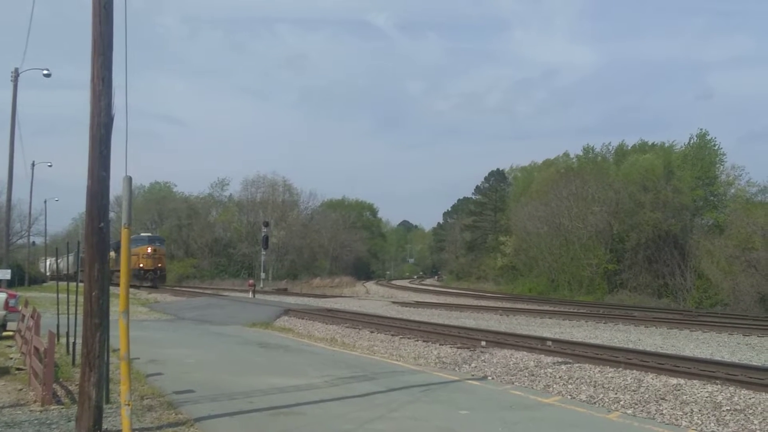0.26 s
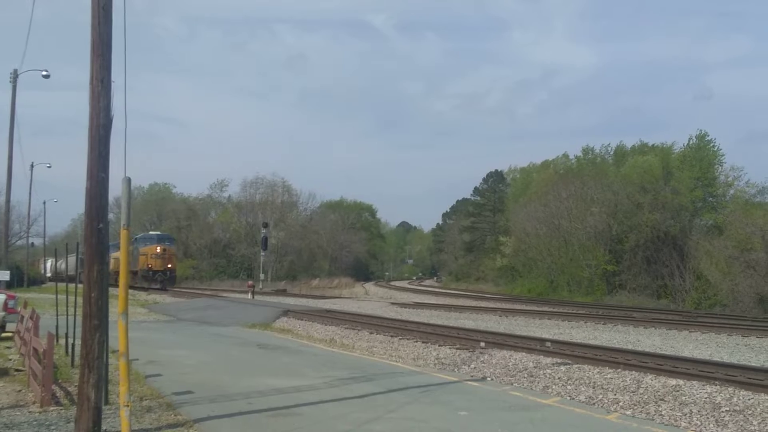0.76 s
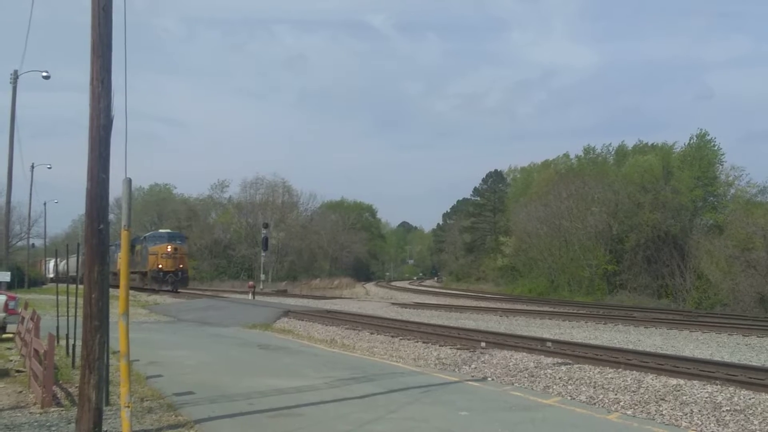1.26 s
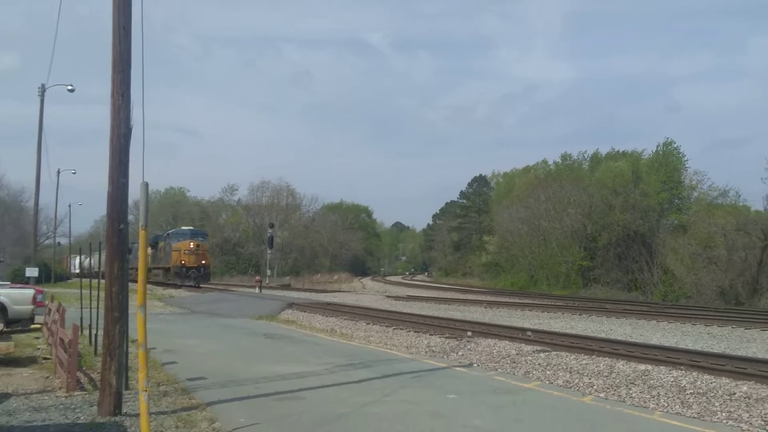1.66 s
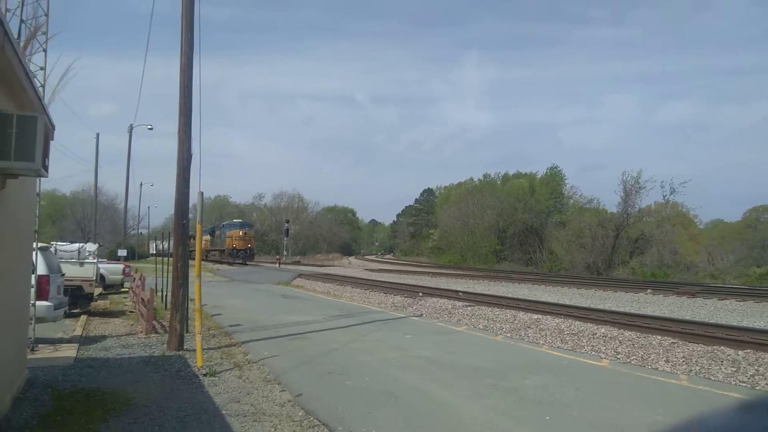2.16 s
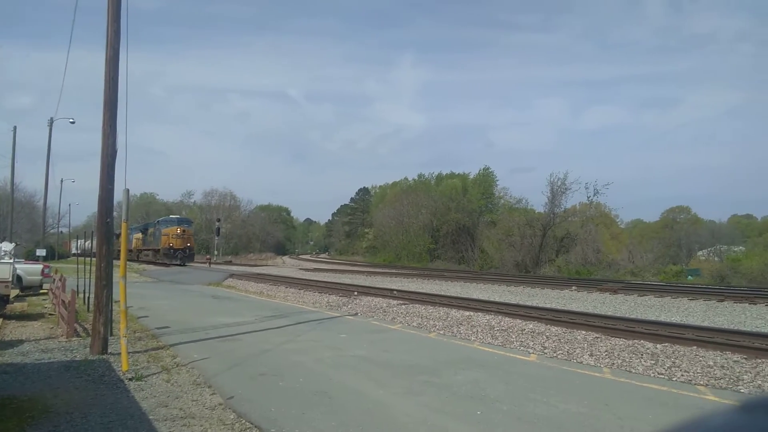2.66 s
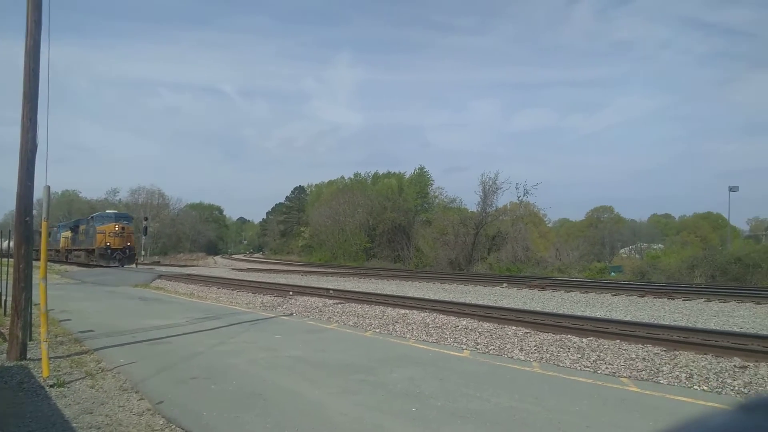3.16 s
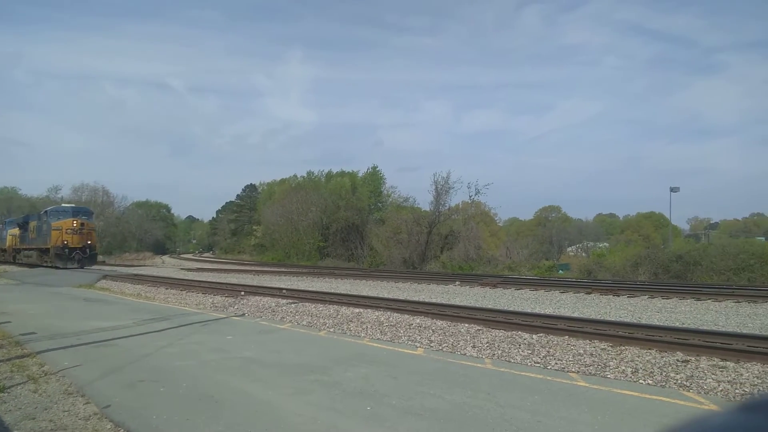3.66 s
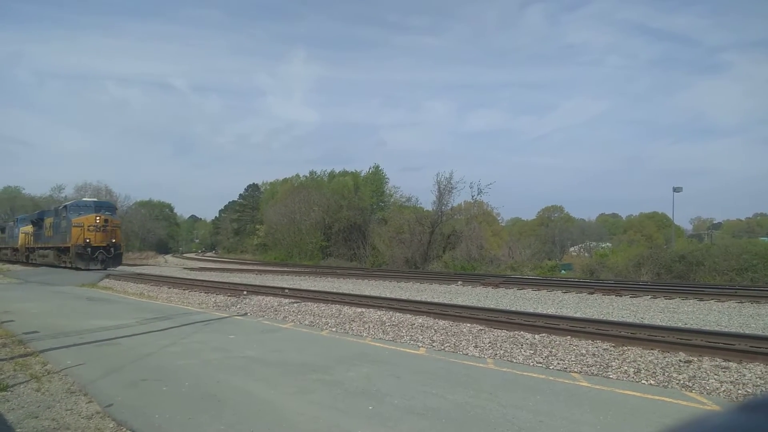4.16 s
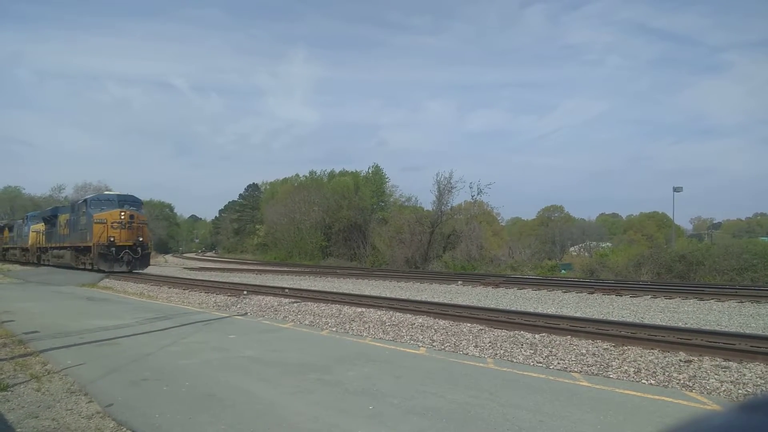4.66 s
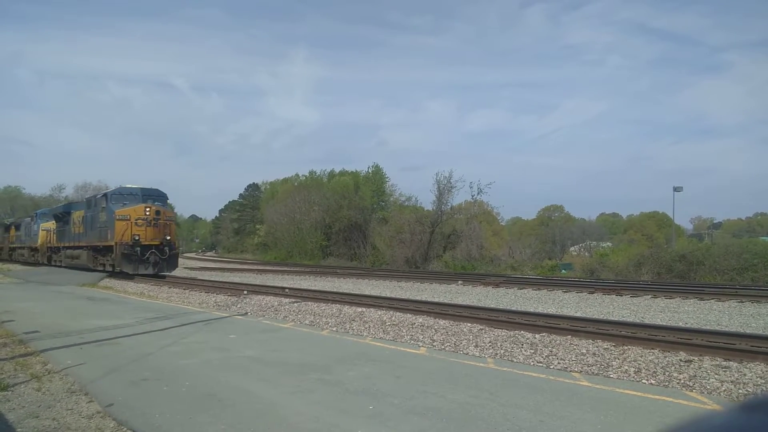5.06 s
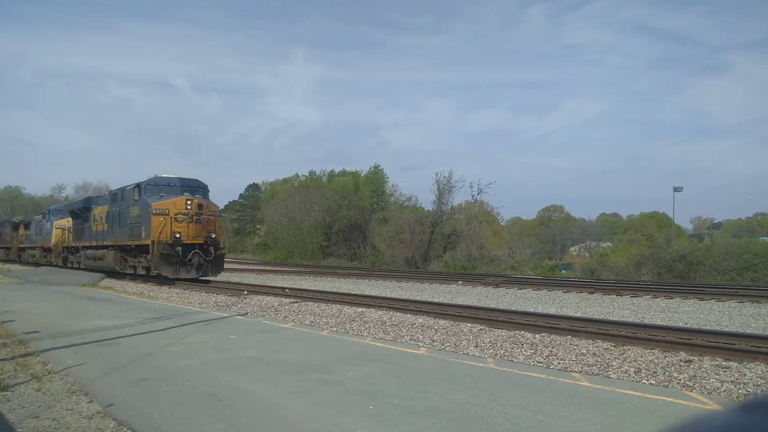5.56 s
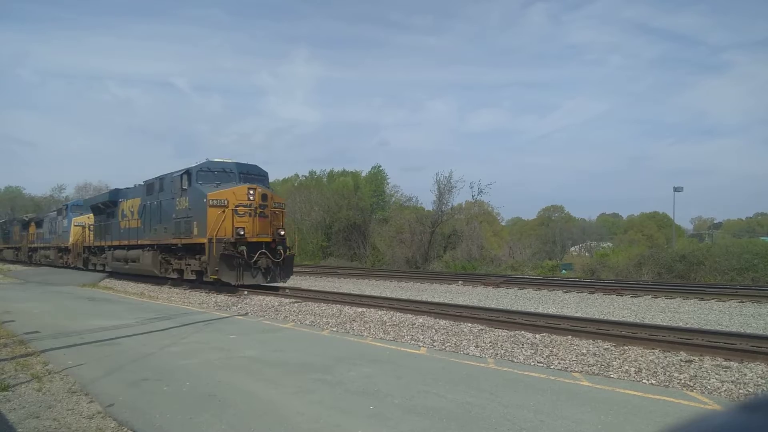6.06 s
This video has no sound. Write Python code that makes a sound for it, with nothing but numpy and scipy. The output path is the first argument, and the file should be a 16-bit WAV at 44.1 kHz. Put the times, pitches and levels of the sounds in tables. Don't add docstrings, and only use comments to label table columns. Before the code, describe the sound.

A handheld phone in open air catches an approaching freight train: rough engine rumble, a beating low drone and grainy rolling noise, gradually fuller and closer. Faint birds chirp at the start, small air ticks follow, and wind gusts boom on the left, briefly dulling the level. Metallic rail ringing and gear whine emerge, then air hisses and a loud dissonant horn chord bursts in and is cut off.

```python
import sys
import numpy as np
from scipy import signal
from scipy.fft import rfft, irfft
from scipy.io import wavfile
from scipy.ndimage import uniform_filter1d, map_coordinates

SR = 44100
rng = np.random.default_rng(int(sys.argv[2]) if len(sys.argv) > 2 else 0)


def store_pcm(level_fs):
    pcm = np.round(np.clip(level_fs, -1, 1) * 32767).astype(np.int16)
    wavfile.write(sys.argv[1], SR, np.atleast_2d(pcm).T)


def elevation(decibels):
    levels = np.asarray(decibels, float)
    return 10 ** (levels / 20)


N = 278712
T = np.arange(N) / SR


def curve(table):
    s, *columns = np.transpose(table)
    return [np.interp(T, s, c) for c in columns]


def unit(x):
    return x / np.sqrt(np.mean(x ** 2))


def walk(rate):
    k = int(SR / rate)
    held = np.repeat(rng.standard_normal(N // k + 1), k)
    return unit(uniform_filter1d(uniform_filter1d(held, k), k)[:N])


def bump(s, width):
    return np.exp(-((T - s) / width) ** 2)


def swell(s, lasts):
    return np.sin(np.pi * np.clip((T - s) / lasts, 0, 1))


def coloured(shape, flicker_db, rate, count=4):
    log_hz = np.log(np.fft.rfftfreq(N, 1 / SR) + 1)
    at, db = np.log(np.array(shape)[:, 0]), np.array(shape)[:, 1]
    spectrum = rfft(rng.standard_normal(N)) * elevation(np.interp(log_hz, at, db, -120, -120))
    centres = np.linspace(at[0], at[-1], count)
    total = np.zeros(N)
    for share in np.eye(count):
        band = irfft(spectrum * np.interp(log_hz, centres, share), N)
        total += band * elevation(flicker_db * walk(rate))
    return unit(total)


def tone(hz, blur=0.):
    cycles = np.cumsum(hz + 0 * T) / SR + rng.random()
    return np.sqrt(2) * np.sin(2 * np.pi * cycles + blur * walk(6))


def high_passed(x):
    return signal.sosfilt(signal.butter(1, 500, "highpass", fs=SR, output="sos"), x)


def aimed(x, lag_ms, pan_db):
    left = map_coordinates(x, [np.arange(N) - lag_ms * SR / 1000], order=3, mode="nearest")
    ports = np.array([left, x])
    return ports + (elevation(np.outer([.5, -.5], pan_db + 0 * T)) - 1) * high_passed(ports)


# f/Hz, level/dB per Hz
SELF_NOISE = [(7000, -18), (10000, -8), (14500, -3)]


def self_noise():
    return elevation(-89.5) * np.array([coloured(SELF_NOISE, flicker_db=1.5, rate=30, count=3) for _ in range(2)])


# t/s after its start, level/dB, from f/Hz, to f/Hz, length/s
BIRD_NOTES = [
    (0, -56, 2400, 2100, .055),
    (.055, -56, 2150, 2200, .05),
    (.14, -53.5, 2900, 3100, .06),
]
# t/s, level/dB
BIRD_CALLS = [
    (.015, 2.5),
    (.4, 2),
    (.765, -5),
]


def bird():
    trill_hz = 130 * walk(450)
    out = np.zeros(N)
    for s, call_db in BIRD_CALLS:
        for after, db, from_hz, to_hz, lasts in BIRD_NOTES:
            glide_hz = np.interp(T - s - after, [0, lasts], [from_hz, to_hz])
            level = elevation(call_db + db + 3 * walk(91.7))
            out += level * swell(s + after, lasts) * tone(glide_hz + trill_hz)
    return out


# f/Hz, level/dB per Hz
GUST_SPECTRUM = [(20, -22), (40, -3.5), (80, 15), (160, 5.5), (260, -17), (420, -13), (800, -49.5)]
# t/s, peak level/dB, half width/s
GUSTS = [(.3, -42, 0.045), (.5, -35, 0.16), (.7, -25, .05), (1.001, -44, 0.28), (1.4, -25, 0.11),
         (1.65, -27.5, 0.17), (2.0, -24.5, 0.14), (2.5, -38, 0.41), (3.0, -27, 0.065), (3.25, -32, 0.13),
         (3.63, -29, 0.26), (3.8, -32, 0.11), (4.0, -25.5, 0.048), (4.22, -39, 0.082), (4.47, -32.5, 0.1),
         (5.0, -35.5, 0.072), (5.201, -36, .06), (5.53, -36, 0.092), (5.7, -45, 0.063), (5.98, -47, 0.066)]
# t/s, peak level/dB, f/Hz, length/cycles
BUFFETS = [
    (1.677, -11, 190, 1.2),
    (1.8, -6, 220, 1.4),
    (2.087, -5, 200, .9),
    (2.316, -9, 160, 1.2),
]


def wind():
    breeze_db = -37.5
    strength = elevation(breeze_db) + sum(elevation(db) * bump(s, width) for s, db, width in GUSTS)
    ports = [elevation(db) * coloured(GUST_SPECTRUM, flicker_db=2.5, rate=45, count=3) for db in (.4, -1.2)]
    out = strength * np.array(ports)
    for s, db, hz, cycles in BUFFETS:
        out[0] += elevation(db) * bump(s, cycles / hz / 2) * np.cos(2 * np.pi * hz * (T - s))
    return out


# t/s, level/dB, low f/Hz, high f/Hz, length/s
PUFFS = [(0.488, -74, 7800, 8500, 0.082), (1.289, -59.5, 11440, 13460, 0.0061),
         (1.29, -64.5, 10900, 13800, 0.023), (1.32, -77, 10560, 13860, .04),
         (1.459, -59.5, 6450, 9570, .008), (1.453, -59.5, 3320, 6140, 0.01), (1.462, -68, 7000, 9200, .04),
         (3.158, -65, 2365, 5380, 0.065), (5.978, -47.5, 4090, 13800, 0.016),
         (6.009, -64.5, 4000, 10740, 0.072), (6.173, -50.5, 3280, 12100, 0.026),
         (6.176, -52.5, 5130, 10300, 0.13), (6.174, -69, 10430, 14030, 0.11), (6.18, -57, 2350, 4270, 0.24)]


def puffs():
    rise, hold, fade = 0.17, 0.68, 0.48
    out, spit = np.zeros((2, N)), elevation(1.4 * walk(200))
    for s, db, low_hz, high_hz, lasts in PUFFS:
        i = int(s * SR)
        t = T[:min(N - i, SR // 2)]
        band = signal.butter(4, [low_hz, high_hz], "bandpass", fs=SR, output="sos")
        slope = signal.butter(1, 1.5 * low_hz, fs=SR, output="sos")
        air = unit(signal.sosfilt(np.vstack([band, slope]), rng.standard_normal((3, SR // 2))))[:, :len(t)]
        shape = np.minimum(t / (rise * lasts), 1) * np.exp(-np.maximum(t / lasts - hold, 0) / fade)
        ports = (1.5 * air[0] + 3.46 * air[1:]) * [[1.3], [.8]]
        out[:, i:i + len(t)] += elevation(db) * shape * ports
    return out * spit


HORN_ON_S = 6.1
IN_STEP_S = 6.1205


def turns(hz):
    phase = 2 * np.pi * np.cumsum(hz) / SR
    return phase - phase[int(IN_STEP_S * SR)]


def bell(hz, db, pressure_db, partials):
    on = int(HORN_ON_S * SR)
    phase, pressure_db, t = turns(hz)[on:], pressure_db[on:], T[on:]
    bark_db = 7.5 * np.exp(-((t - HORN_ON_S) / 0.026) ** 2)
    slip_s = .035
    slip_rad = 2.2 * (1 - np.exp(-np.maximum(t - IN_STEP_S - slip_s / 4, 0) / slip_s))
    drift_rad = 2.5 * np.abs(t - IN_STEP_S)
    stack = 0
    for k, p_db in enumerate(partials):
        level_db = p_db + 0.3 * k * pressure_db
        if k < 6:
            level_db = level_db + min(k / 2, 1) * bark_db
        level_db = level_db + 2.2 * min(k / 3 + .2, 1) * walk(20)[on:]
        angle = (k + 1) * phase + drift_rad * walk(8)[on:] + slip_rad * rng.uniform(-1, 1)
        tremble = .15 * min(k / 4, 1) * walk(90)[on:]
        stack = stack + elevation(level_db) * np.cos(angle + tremble)
    return np.sqrt(2) * elevation(db) * np.pad(stack, (on, 0))


# delay/ms to left port, delay/ms to right port, level/dB
HORN_ECHOES = [
    (7.24, 6.1, -16.5),
    (22.73, 33, -22),
    (45.9, 5.9, -13),
]


def slaps(x):
    out = np.zeros((2, N))
    for *delays, db in HORN_ECHOES:
        out += elevation(db) * np.array([np.interp(T - ms / 1000, T, x) for ms in delays])
    return out


# t/s, level/dB re full
PRESSURE = [(6.1, -22), (6.107, -7.5), (6.128, -1.5), (6.15, -2.5), (6.19, 0), (6.24, 1), (6.275, -1),
            (6.32, -4)]
# f/Hz, sag/Hz per s
BELL_PITCH = [
    (273, 16),
    (338.3, 44),
    (409.5, 32),
]
# level/dB, dB per dB of pressure
BELLS = [
    (-26.5, 1.6),
    (-15, 1.0),
    (-20, 1.1),
]
# left port lag/ms, left minus right/dB
BELL_PORTS = [
    (0.19, -2.5),
    (0.044, -0.5),
    (0.1, 1.5),
]
LOW_PARTIALS = [-1, -19.5, -21, 0.5, -8, -38, -9, -30, -33, -24.5, -19, -23, -19.5, -31, -23, -25]
MID_PARTIALS = [-21.5, 2, -19.5, -30.5, -34, -49, -49, -48, -41, -52, -50.5]
TOP_PARTIALS = [-31, -8.5, -14, -13.5, -12.5, -18.5, -29.5, -41, -46]
# t/s, level/dB, f/Hz
OCTAVE = [(6.1, -23.5, 540), (6.115, -11.5, 553), (6.14, -21, 547), (6.17, -28, 554), (6.2, -37, 547.5),
          (6.225, -18.5, 544), (6.32, -22, 542)]
# f/Hz, level/dB per Hz
RASP = [(500, -22), (900, -1), (1500, -9), (2300, -14), (3600, -22), (5000, -23)]


def horn():
    pressure_db, since = curve(PRESSURE)[0], np.maximum(T - HORN_ON_S, 0)
    pitches = [hz - sag * since for hz, sag in BELL_PITCH]
    stacks = (LOW_PARTIALS, MID_PARTIALS, TOP_PARTIALS)
    low, mid, top = (bell(hz, db + follows * pressure_db, pressure_db, partials)
                     for hz, (db, follows), partials in zip(pitches, BELLS, stacks))
    root = bell(pitches[2], BELLS[2][0] + 0.39 * pressure_db, pressure_db, [2.5])
    octave_db, octave_hz = curve(OCTAVE)
    low = low + elevation(octave_db) * np.sqrt(2) * np.cos(turns(octave_hz))
    mid = mid + elevation(pressure_db - 39.5) * coloured(RASP, flicker_db=2.5, rate=60)
    rattle = .05 + .25 * np.exp(-since / .025)
    valve = (1 + rattle * walk(540)) * np.clip(since / .006, 0, 1)
    out = slaps(valve * (low + mid + top)) + aimed(valve * root, 0.39, 5)
    for x, (lag_ms, pan_db) in zip((low, mid, top), BELL_PORTS):
        out += aimed(valve * x, lag_ms, pan_db)
    return out


# t/s, level/dB, length/s
WHINES = [(0, -51, 0.49), (1.02, -52.5, 0.51), (2.55, -62, 0.3), (3.4, -54, 0.36), (3.84, -52, 0.43),
          (4.55, -43, .45), (4.95, -42, 0.6), (5.5, -45.5, 0.64)]
WHINE_PARTIALS = [
    -1.4,
    -3,
    -14,
]
# t/s, level/dB, f/Hz, length/s
SINGS = [(2.3, -57, 2286, .7), (3.45, -60, 2293, .25), (4.15, -59, 1823, .3), (4.2, -49, 2292, .18),
         (4.6, -50.5, 765.4, 1.5), (5.6, -57, 2293, 0.29), (5.5, -45, 766, .55), (5.6, -44, 651, .5),
         (5.45, -45, 622, .4), (4.7, -49, 845, .25), (5.5, -50, 845, .3), (5.2, -35, 190, .95),
         (4.35, -47, 625, .4)]


def gears():
    load = elevation(-53.5) + sum(elevation(db) * swell(s, lasts) for s, db, lasts in WHINES)
    mesh_hz = 728.7
    stack = sum(elevation(p_db + 2.5 * walk(9)) * tone(mesh_hz * (k + 1) / 2, blur=1.6)
                for k, p_db in enumerate(WHINE_PARTIALS))
    passing = sum(elevation(db + 2.9 * walk(5.6)) * swell(s, lasts) * tone(hz, blur=2.8)
                  for s, db, hz, lasts in SINGS)
    return load * stack + passing


# f/Hz, level/dB per Hz
HISS = [(1300, -22.5), (1700, 3), (2050, 1.5), (2320, 5), (2550, -1.5), (3200, -5.5), (4200, -4.5),
        (5300, -10.5), (6300, -13.5), (7400, -14.5), (8500, -16.5), (10300, -26.5), (11500, -29),
        (14000, -40)]


def fans(hiss_db):
    return elevation(hiss_db + 6.5) * coloured(HISS, flicker_db=2.5, rate=38, count=7)


# f/Hz, level/dB per Hz
ROAR = [(250, -13.5), (380, 0), (480, -2), (720, -3), (1000, -5.5), (1400, -11.5), (1900, -19), (2800, -21)]
# f/Hz, level/dB per Hz
RING = [(520, -29.5), (600, 1.5), (680, 1), (770, -3.5), (860, -10.5), (1000, -39.5)]


def wheels(roar_db):
    far_db, near_db = -22, -1
    ring_db = far_db + (near_db - far_db) / (1 + np.exp((3.7 - T) / 0.19))
    ring = elevation(ring_db) * coloured(RING, flicker_db=0.5, rate=11.0, count=3)
    return elevation(roar_db - 1.5) * (coloured(ROAR, flicker_db=1.0, rate=13) + ring)


# f/Hz, level/dB per Hz
THROB = [(25, -38.5), (45, -9.5), (65, -1), (130, -3.5), (210, 1), (260, -7), (330, -3.5), (400, -23),
         (520, -27.5)]


def exhaust_gas(throb_db):
    return elevation(throb_db + 4.5) * coloured(THROB, flicker_db=1.75, rate=11.0)


def rolling(throb_db, roar_db, hiss_db):
    return exhaust_gas(throb_db) + wheels(roar_db) + fans(hiss_db)


# order of the two-turn engine cycle, level/dB
EXHAUST = [(6, -17.5), (8, -8.5), (9, 1), (11, -17), (12, 2), (13, 1.5), (15, -0.5), (16, 5.5), (20, 5.5),
           (22, -1.5), (24, 1), (25, -3), (26, -8.5), (27, -4.5), (30, -8), (34, -4.5), (40, -3)]
# t/s, depth/dB, half width/s
BEATS = [(.23, 6, 0.053), (.44, 9, 0.056), (0.989, 21, 0.066), (1.12, 12, 0.022), (1.28, 13, 0.012),
         (1.55, 7, 0.025), (1.65, 17, 0.013), (1.84, 7, 0.034), (2.238, 14, 0.039), (2.45, 7, 0.038),
         (2.59, 5, .02), (2.72, 5, 0.019), (2.89, 7, 0.03), (3.03, 3.5, 0.049), (3.55, 5.5, 0.029),
         (3.14, 9, 0.045), (3.33, 7, 0.031), (3.7, 19, 0.045), (3.922, 11, 0.034), (4.119, 9.5, 0.021),
         (4.31, 28.5, 0.027), (4.47, 16, 0.015), (4.72, 1, .02), (4.8, 1, 0.017), (4.89, 6, 0.027),
         (5.0, 4, .02), (5.239, 8.5, 0.057), (5.4, 4, 0.019), (5.51, 14, 0.04), (5.63, 8, 0.0068),
         (5.78, 2, 0.047), (6.02, 5.5, 0.043), (6.14, 7, 0.017)]


def engines(hum_hz, hum_db, throb_db):
    cycle_hz = uniform_filter1d(hum_hz, SR) / 42
    lines = sum(elevation(db + 2.2 * walk(5)) * tone(order * cycle_hz, blur=0.8) for order, db in EXHAUST)
    beat_db = .8 * walk(20) - sum(db * bump(s, width) for s, db, width in BEATS)
    hum = elevation(hum_db + beat_db) * tone(hum_hz, blur=0.35)
    return elevation(throb_db + 5.0) * unit(lines) + hum


# t/s, stack hum f/Hz, train loudness level/dB, hum level/dB
TRAIN = [(0, 326.2, -1.5, -29.5), (.5, 326.8, 0.5, -38), (.8, 320.6, 0.5, -30.5), (1.1, 324.7, -0.5, -28.5),
         (1.35, 325, 0.5, -34), (1.75, 323.7, -0.5, -28.5), (2, 320.8, 0.5, -34.5), (2.35, 323.9, 0, -27.5),
         (3.1, 324.8, 1, -24), (3.6, 323.5, 0, -21.5), (3.9, 319, -1, -21), (4.1, 318, -2.5, -27.5),
         (4.33, 319.2, -0.5, -19.5), (4.7, 320.2, 0.5, -21), (5.15, 319.7, -0.5, -21.5), (5.7, 320, 2, -24),
         (6, 322.7, 2, -25), (6.3, 326.6, -4.5, -25.5)]
# t/s, left port lag/ms, left minus right/dB, echoed share (0-1)
AIM = [(0, 0.045, -0.5, 0.6), (1, 0.064, -0.5, 0.81), (2, 0.27, 8, 1), (3, 0.32, 6, 0.87),
       (3.8, 0.2, 1.5, 0.92), (4.5, 0.21, 0.7, 0.77), (5.5, 0.17, -1, 0.69), (6.05, 0.18, 0.5, 0.54),
       (6.15, 0.074, -3.5, 1)]


def scene():
    hum_hz, loud_db, hum_db = curve(TRAIN)
    throb_db = -30 + 0.8 * loud_db + 0.41 * T
    roar_db = -36.5 + 1.34 * loud_db - 0.21 * T
    hiss_db = -53 + 1.27 * loud_db + 0.29 * T
    lag_ms, pan_db, echoed = curve(AIM)
    echoed = np.clip(echoed, 0, 1)
    noise = rolling(throb_db, roar_db, hiss_db)
    reflected = np.array([rolling(throb_db, roar_db, hiss_db) for _ in range(2)])
    echoes = np.sqrt(echoed) * high_passed(reflected)
    direct = bird() + gears() + engines(hum_hz, hum_db, throb_db)
    direct += noise - (1 - np.sqrt(1 - echoed)) * high_passed(noise)
    ports = aimed(direct, lag_ms, pan_db) + echoes + horn()
    return ports * elevation(np.array([[-.6], [.6]])) + puffs() + wind() + self_noise()


# t/s, dip/dB, recovery/s
DUCKS = [
    (1.804, 8, 0.52),
    (3.26, 2.5, 0.094),
    (4.04, 2, 0.22),
    (4.833, 2.5, 1),
    (6.109, 3.5, 1),
]


def ducked(x):
    dip_db = sum(db * (T > s) * np.exp(-np.maximum(T - s, 0) / back) for s, db, back in DUCKS)
    ceiling = 1.3
    return ceiling * np.tanh(x * elevation(-uniform_filter1d(dip_db, 128)) / ceiling)


def widened(x):
    lag = 21
    dull = signal.sosfiltfilt(signal.butter(2, 6800, fs=SR, output="sos"), x[::-1])
    late = np.pad(dull, ((0, 0), (lag, 0)), mode="reflect")[:, :N]
    return x - 0.63 * late


# f/Hz, level/dB, rise/dB per dB of loudness
DROP = [(1300, -30, .3), (1800, -20, .3), (1950, -15, .7), (2150, -12.5, .6), (2450, -20, .3),
        (3150, -11.5, .3), (4200, -14, .4), (5250, -11, .2), (6300, -4, .1), (6700, -4.5, .1),
        (7400, -7, .1), (14000, -8, .1)]
# f/Hz, share
SPARSE = [
    (3000, 0),
    (6500, .15),
    (8500, .5),
    (10500, .9),
    (14000, 1.1),
]
# f/Hz, share
STARVED = [
    (7500, 0),
    (9000, .05),
    (10500, .13),
    (14000, .1),
]


def thrifty(x):
    hop, lead = 1024, 764
    pair = np.pad([x[0] + x[1], x[0] - x[1]], ((0, 0), (lead, 0))) / 2
    hz, s, frames = signal.stft(pair, SR, "cosine", 2 * hop, hop)
    edges = np.r_[0:256:8, 256:hop:12]
    widths = np.diff(np.r_[edges, hop + 1])
    power = np.add.reduceat(abs(frames) ** 2, edges, axis=1) + 1e-18
    loud_db = 10 * np.log10(power.sum(axis=(0, 1)))
    at, *columns = np.transpose(DROP)
    base_db, rise = (np.interp(np.log(hz[edges] + 80), np.log(at), c)[:, None] for c in columns)
    excess_db = loud_db - np.median(loud_db) + 1.2 * (s - s.mean())
    limit_db = base_db + rise * excess_db + 1.5 * np.interp(s, T, walk(3.7))
    limit_db = limit_db + 1.5 * rng.standard_normal(power.shape)
    keep = np.repeat(power > power[::-1] * elevation(2 * limit_db), widths, axis=1)
    mean = np.repeat(power / widths[:, None], widths, axis=1)
    keep &= abs(frames) ** 2 > mean * np.interp(hz, *np.transpose(SPARSE))[:, None]
    luck = np.repeat(rng.random((len(edges), len(s) // 2 + 1)), 2, axis=1)[:, :len(s)]
    starved = np.interp(hz[edges], *np.transpose(STARVED))[:, None]
    keep &= np.repeat(luck >= starved, widths, axis=0)
    both, apart = signal.istft(frames * keep, SR, "cosine", 2 * hop, hop)[1][:, lead:lead + N]
    return np.array([both + apart, both - apart])


def top_cut(x):
    return signal.sosfilt(signal.butter(12, 14290, fs=SR, output="sos"), x)


def record(dry):
    mix = thrifty(widened(ducked(dry)))
    return top_cut(mix)


dry = scene()
out = record(dry)
store_pcm(out)
```